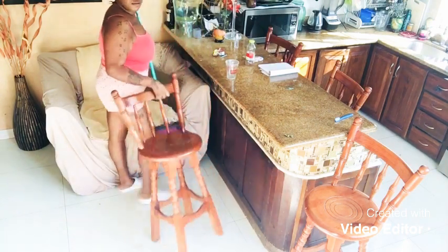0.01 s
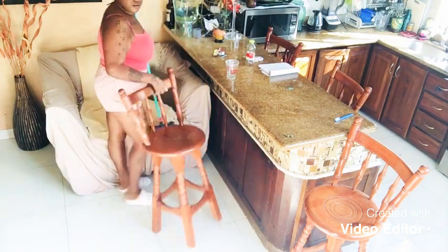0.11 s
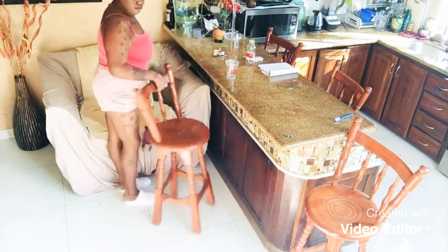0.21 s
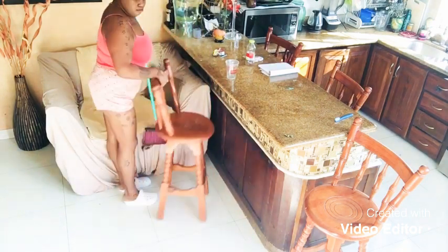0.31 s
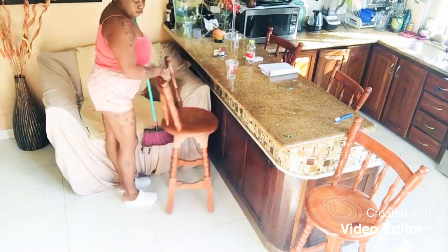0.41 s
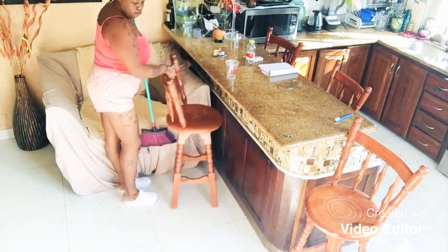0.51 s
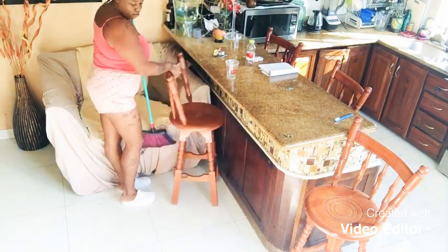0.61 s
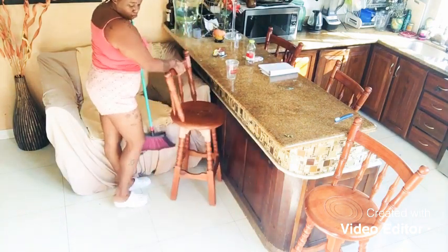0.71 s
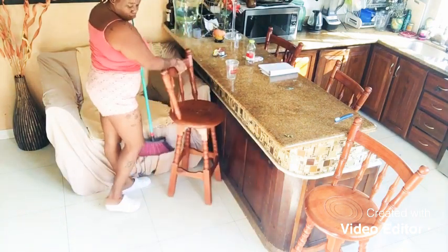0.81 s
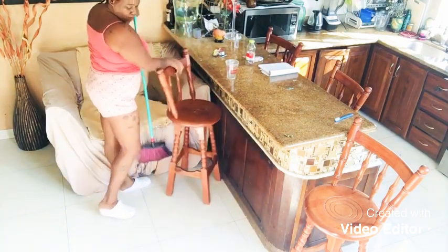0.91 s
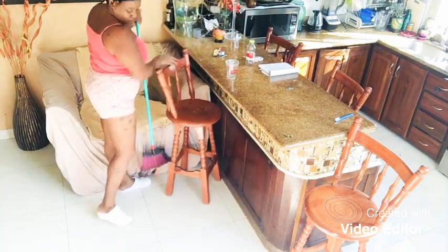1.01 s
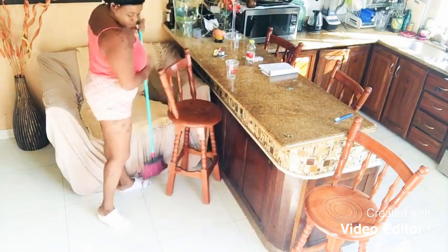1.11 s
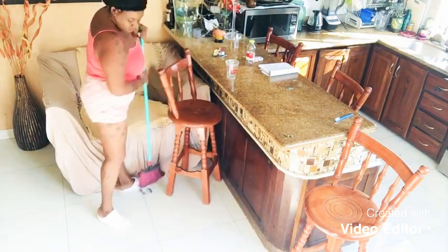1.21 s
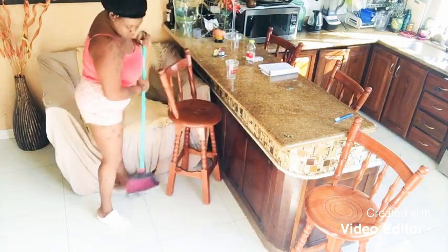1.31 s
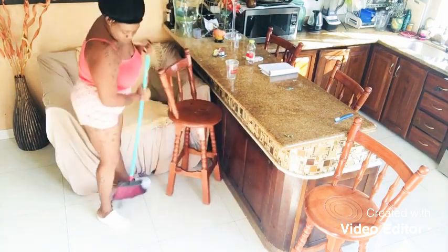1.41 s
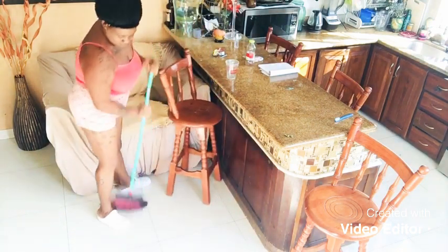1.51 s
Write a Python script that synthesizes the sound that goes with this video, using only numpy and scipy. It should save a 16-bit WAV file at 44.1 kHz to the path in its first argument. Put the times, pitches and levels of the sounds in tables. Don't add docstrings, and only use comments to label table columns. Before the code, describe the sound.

Wooden stool dragged on kitchen tiles, close up in a bright, hard room. Faint broom hiss until 0.2 s, then a loud double wooden knock at 0.22 s and rough, stuttering scraping with hollow clacks and low groans until 0.7 s. A weaker shove comes at 0.81-0.93 s, a low scuff with broom swish and ticks around 1.05-1.2 s, then near quiet with a faint brush at 1.5 s.

```python
import sys
import numpy as np
from scipy import signal
from scipy.fft import rfft, irfft, next_fast_len
from scipy.io import wavfile
from scipy.ndimage import map_coordinates

SR = 44100
rng = np.random.default_rng(int(sys.argv[2]) if len(sys.argv) > 2 else 0)


def volts(x):
    e = np.asarray(x, float) / 20
    return 10 ** e


def materialize(psi):
    bounded = np.clip(np.atleast_2d(psi).T, -1, 1)
    quanta = np.round(bounded * 32767).astype(np.int16)
    wavfile.write(sys.argv[1], SR, quanta)


N = 70560

# start_s, peak_db, ring_pitch_hz, chatter_s, brightness_db_per_octave
KNOCKS = [
    (0.2186, -6, 1560, 0.0076, 0.5),
    (.227, -3.5, 1390, 0.0075, 0.5),
    (0.241, -14.5, 1200, 0.0155, 2),
    (0.8104, -20.5, 1900, 0.013, -1.5),
    (1.056, -29.5, 595, 0.012, -2.5),
]


def unit(x):
    return x / np.sqrt(np.mean(x ** 2) + 1e-20)


def along(points, hz):
    f, v = np.transpose(points)
    return np.interp(np.log(hz + 1), np.log(f + 1), v)


def curves(rows):
    s, *cols = np.transpose(rows)
    return [np.interp(np.arange(N) / SR, s, c) for c in cols]


def wobble(rate_hz):
    return map_coordinates(rng.standard_normal(400), [np.arange(N) * rate_hz / SR])


def filtered(x, response):
    m = next_fast_len(len(x) + 8192)
    return irfft(rfft(x, m) * response(np.fft.rfftfreq(m, 1 / SR)), m)[:len(x)]


def causal(gain):
    c = irfft(np.log(gain + 1e-6))
    c[1:len(c) // 2] *= 2
    c[len(c) // 2 + 1:] = 0
    return np.exp(rfft(c))


def modes(table, f):
    total = 0
    for k, (centre, width, db) in enumerate(table):
        damping = 1j * f * width
        total = total + (-1) ** k * volts(db) * damping / (centre * centre - f * f + damping)
    return total


def wood(f):
    # pitch_hz, level_db
    broad = [(120, -7.5), (300, -5), (900, -2.5), (2300, -2.5), (3900, -15), (4900, -23.5), (7000, -24.5),
             (15500, -43)]
    # pitch_hz, width_hz, level_db
    legs = [(663, 49, 4), (867, 32, 1), (948, 86, 5), (1127, 52, 11.5), (1302, 40, 0), (1488, 34, 2),
            (1650, 48, 2.5), (1706, 32, 2.5), (2027, 73, 3), (2153, 24, 2.5), (2950, 240, -0.5),
            (3584, 180, 11), (4334, 160, 9)]
    return volts(along(broad, f)) * (1 + volts(-6) * np.abs(modes(legs, f)))


def slips(per_s, scatter_db):
    happens, draw, side = rng.random((3, N))
    size = volts(-scatter_db * np.log(draw + 0.039)) * np.sign(side - .5)
    return unit((happens < per_s / SR) * size + 0.17 * rng.standard_normal(N))


def contact(peak_s, hz, length_s, tilt_db, ring_db):
    t = np.arange(8192) / SR
    rise_s, grit_s, grit_db = .0008, .0015, 2
    swell = (1 - np.exp(-t / rise_s)) * np.exp(-((t - peak_s) / length_s) ** 2)
    grit = np.interp(t / grit_s, np.arange(200), rng.standard_normal(200))
    chatter = np.pad(rng.standard_normal(len(t)) * swell * volts(grit_db * grit), (0, 8192))
    f = np.fft.rfftfreq(len(chatter), 1 / SR)
    tilt = volts(tilt_db * np.log2(np.clip(f, 200, 6000) / 1500))
    ring = 1 + volts(ring_db) * np.abs(modes([(hz, .45 * hz, 0)], f))
    blow = irfft(rfft(chatter) * causal(wood(f) * tilt * ring))[:len(t)]
    return volts(-6) * blow / np.sqrt(np.sum(blow ** 2) / (length_s * SR))


def knocks():
    out = np.zeros(N + 8192)
    for s, db, hz, length_s, tilt_db in KNOCKS:
        out[round(s * SR):][:8192] += volts(db) * contact(0, hz, length_s, tilt_db, ring_db=9)
    return out[:N]


def skids():
    # peak_s, level_db, ring_pitch_hz, half_length_s, brightness_db_per_octave
    crossings = [(0.093, -35, 1040, 0.0067, -10), (0.119, -40.5, 590, 0.015, 11),
                 (0.282, -16.5, 1400, 0.007, -4), (0.323, -17.5, 2200, 0.0075, -0.5),
                 (0.372, -16.5, 1290, 0.0078, 2.5), (0.401, -7.5, 2360, .006, 1.1),
                 (0.41, -11.5, 1220, 0.0055, -1), (0.431, -13.5, 696, 0.0057, -1.5),
                 (0.488, -16, 2083, 0.009, 0), (0.537, -15.5, 1070, .01, -0.5),
                 (0.564, -10, 1850, 0.0053, 0.5), (0.582, -10, 1970, 0.0084, 2.5),
                 (0.616, -15.5, 2160, 0.0053, 1), (0.644, -11, 2270, .014, 3.5),
                 (0.829, -15, 850, 0.0067, -3.5), (.843, -21.5, 1130, 0.0066, -1),
                 (0.874, -25, 1110, 0.0058, -3), (0.919, -28, 880, .006, -2.5),
                 (0.857, -24.5, 1154, 0.013, 1.5), (0.886, -27.5, 1420, 0.014, 1.5),
                 (1.081, -24, 1140, .007, -0.5), (1.106, -23, 808, 0.0062, -1.5),
                 (1.114, -22.5, 2120, 0.0042, 3), (1.121, -17.5, 1870, .006, -0.5),
                 (1.135, -28.5, 1480, 0.0074, -0.5), (0.508, -19, 1110, .008, -0.5),
                 (0.669, -21.5, 1110, .01, 1.5)]
    out = np.zeros(N + 8192)
    for s, db, hz, half_s, tilt_db in crossings:
        lead_s = 2 * half_s
        out[round((s - lead_s) * SR):][:8192] += volts(db) * contact(lead_s, hz, half_s, tilt_db, ring_db=7)
    return out[:N]


def seat():
    # pitch_hz, level_db, t60_s
    seat_modes = [(489.4, -8.5, 0.079), (666, -16.5, 0.11), (817, -7.5, 0.059), (1111, -7, .12),
                  (1315, -8, 0.063), (1462, -1, 0.089), (1609, 3.5, 0.087), (1748, -4, 0.14),
                  (1940, -5, 0.12), (2115, -7, 0.079)]
    crack_hz, crack_db, crack_t60_s = 4840, -30, 0.067
    out, t = np.zeros(N + 8192), np.arange(8192) / SR
    for s, db, *_ in KNOCKS:
        ring = 0
        for hz, level_db, t60_s in seat_modes:
            spread_db = 2 * rng.standard_normal()
            ring = ring + volts(level_db + spread_db - 60 * t / t60_s) * np.sin(2 * np.pi * hz * t)
        crack = unit(filtered(rng.standard_normal(len(t)),
                              lambda f: f ** 2 / (f ** 2 + crack_hz ** 2) / (1 + (f / crack_hz) ** 2)))
        crack = volts(crack_db - 60 * t / crack_t60_s) * crack
        out[round(s * SR):][:len(t)] += volts(db) * (volts(-14.5) * ring + crack)
    return out[:N]


def scrape():
    # time_s, level_db
    drag = [(0, -51.5), (.1, -50), (.2, -54), (.222, -34.5), (.245, -20), (.285, -20.5), (.3, -30.5),
            (.35, -30.5), (.42, -23.5), (.47, -30), (.6, -23), (.68, -29), (.76, -39.5), (.85, -43),
            (.92, -43), (1.03, -51.5), (1.1, -41), (1.2, -40), (1.35, -70), (1.6, -68)]
    pressure_db, = curves(drag)
    grains = unit(filtered(slips(per_s=2200, scatter_db=2.5), wood))
    return volts(pressure_db - 2 + 1.5 * wobble(45)) * grains


def judder():
    # time_s, rate_hz, level_db
    rocking = [(0, 75.7, -51.5), (.092, 72.4, -48.5), (.2, 72.9, -56), (.232, 69.5, -40.5), (.3, 71, -49),
               (.392, 75, -44), (.444, 75.6, -52.5), (.482, 74.2, -46), (.584, 74.4, -45.5),
               (.63, 73.5, -38), (.782, 72.9, -48.5), (.834, 73.9, -43), (.905, 86.6, -37.5),
               (.94, 80, -62.5), (1.01, 74, -49), (1.088, 91, -51), (1.154, 96.4, -43.5),
               (1.21, 88.8, -61.5), (1.6, 76, -72.5)]
    rate_hz, level_db = curves(rocking)
    turn = 2 * np.pi * np.cumsum(rate_hz * (1 + .07 * wobble(40))) / SR
    level = np.sqrt(2) * volts(level_db + 4.0 + 1.7 * wobble(60))
    return level * (np.sin(turn) + 0.043 * np.sin(2 * turn))


def moans():
    # middle_s, half_length_s, first_pitch_hz, last_pitch_hz, level_db
    sung = [(0.134, 0.033, 602, 588, -53), (0.24, 0.022, 490, 482, -33), (0.285, 0.014, 183, 179, -32),
            (0.51, 0.033, 351, 358, -31), (0.58, .045, 175, 172, -32), (0.685, 0.038, 352, 357, -34),
            (.826, .014, 166, 164, -37), (.89, .028, 174, 183, -39), (.875, .018, 238, 244, -41),
            (0.92, 0.03, 252, 259, -42), (.99, 0.065, 263, 250, -47), (1.105, 0.027, 170, 174, -32),
            (1.185, 0.035, 178, 205, -41), (1.26, .03, 170, 160, -51), (1.03, .03, 166, 172, -48),
            (0.355, 0.03, 180, 186, -35), (.41, .025, 180, 186, -35), (.5, .02, 172, 174, -36),
            (.655, .015, 176, 174, -37), (.42, .015, 350, 360, -37), (.83, .018, 240, 236, -42),
            (1.504, 0.0577, 212, 216, -63), (0.042, 0.15, 290, 299, -60), (1.12, .05, 362, 358, -41),
            (1.23, .025, 352, 348, -48), (.826, .014, 485, 480, -39), (.826, .014, 560, 560, -40),
            (1.11, .02, 490, 485, -42), (.43, .03, 680, 660, -35)]
    out, t = np.zeros(N), np.arange(N) / SR
    for s, half_s, first_hz, last_hz, db in sung:
        pitch_hz = np.interp(t, [s - half_s, s + half_s], [first_hz, last_hz])
        turn = 2 * np.pi * np.cumsum(pitch_hz * (1 + .005 * wobble(40))) / SR
        swell = np.exp(-((t - s) / half_s) ** 2)
        out += np.sqrt(2) * volts(db + 1.5 * wobble(50)) * swell * np.sin(turn)
    return out


def hum():
    # time_s, level_db
    load = [(0.0, -44.5), (0.186, -83), (0.23, -33), (.45, -28.5), (.72, -32), (.79, -54), (.83, -34),
            (.92, -41), (.95, -52), (1.04, -44.5), (1.108, -26), (1.2, -40.5), (1.376, -67.5), (1.6, -64.5)]
    # pitch_hz, width_hz, level_db
    frame_modes = [(168.8, 33, 0.5), (197, 35.4, 0.5), (243.2, 11, -2.5), (364.5, 65, -5), (483, 23, -6.5),
                   (573, 48, -8.5)]
    load_db, = curves(load)

    def body(f):
        boom = f ** 3 * 120 / (90 ** 2 + f * f) ** 2 / (1 + (f / 500) ** 2)
        return modes(frame_modes, f) + 0.26 * boom

    return volts(load_db - 4.0) * unit(filtered(slips(per_s=600, scatter_db=2.3), body))


def bristles():
    # start_s, swell_s, fade_s, level_db
    strokes = [
        (-.05, 0.056, 0.3, -60.5),
        (.045, 0.042, 0.27, -60.5),
        (.988, 0.0073, 0.029, -51.5),
        (1.052, 0.01, 0.15, -49.5),
        (1.461, 0.015, 0.069, -59),
        (1.5, 0.06, .08, -56.5),
    ]
    # pitch_hz, level_db_per_hz
    colour = [(240, -65), (400, -16), (1120, -3.5), (1240, -2.5), (1510, -5), (1690, -4.5), (3570, -1.5),
              (11200, -13), (15500, -17)]
    t, shape = np.arange(N) / SR, np.zeros(N)
    for s, swell_s, fade_s, db in strokes:
        swell = np.clip((t - s) / swell_s, 0, 1) ** 0.58
        shape += volts(db) * swell * np.exp(-np.clip((t - s - swell_s) / fade_s, 0, 9))
    hiss = unit(filtered(slips(per_s=5000, scatter_db=0.81), lambda f: volts(along(colour, f))))
    return shape * volts(wobble(60)) * hiss


def ticks():
    # start_s, level_db, ring_pitch_hz, ring_over_rattle_db
    taps = [
        (0.855, -53, 6350, 3),
        (.99, -65, 4600, 11),
        (0.999, -59, 6600, -1),
        (1.004, -74, 5390, 19),
        (1.025, -64, 5430, 3),
        (1.08, -52.5, 5600, -8.5),
        (1.467, -58, 2950, 2.5),
    ]
    ring_t60_s, rattle_t60_s = 0.076, 0.057
    out, t = np.zeros(N + 4096), np.arange(4096) / SR
    for s, db, hz, ring_db in taps:
        drift, noise = rng.standard_normal((2, 4097))
        ring = np.sin(2 * np.pi * hz * t + 0.061 * np.cumsum(drift[1:]))
        ring = volts(ring_db - 60 * t / ring_t60_s) * ring
        rattle = volts(-60 * t / rattle_t60_s) * np.diff(noise)
        out[round(s * SR):][:4096] += volts(db) * (ring + rattle)
    return out[:N]


def whistles():
    # start_s, end_s, pitch_hz, width_hz, level_db
    bands = [
        (.045, .23, 9800, 894, -70),
        (0.043, 0.225, 11500, 1000, -69),
        (1.081, 1.095, 5400, 900, -49),
        (1.081, 1.095, 4100, 500, -48),
    ]
    out, t = np.zeros(N), np.arange(N) / SR
    for s, end, hz, width, db in bands:
        gate = np.clip(np.minimum(t - s, end - t) / .006, 0, 1)
        hiss = unit(filtered(rng.standard_normal(N), lambda f: modes([(hz, width, 0)], f) ** 2))
        out += volts(db + 3.04 * wobble(67)) * gate * hiss
    return out


def room(x):
    # pitch_hz, t60_s
    decay = [(100, 1), (400, 0.59), (1500, 0.45), (4000, 0.47), (8000, 0.37), (14000, 0.48)]
    step, wall = round(.1 * SR), round(.004 * SR)
    out = np.zeros(N + 2 * SR)
    for at in range(0, N, step):
        hz, t, z = signal.stft(rng.standard_normal(SR // 2 + 4096), SR, nperseg=256)
        fading = z / (np.abs(z) + 1e-9) * volts(-60 * t / along(decay, hz)[:, None])
        tail = signal.istft(fading, SR, nperseg=256)[1]
        piece = signal.fftconvolve(x[at:at + step], tail / np.linalg.norm(tail))
        out[at + wall:][:len(piece)] += piece
    return out[:N]


def still_air():
    # pitch_hz, level_db_per_hz
    colour = [(25, -36.5), (60, 6.5), (200, -9), (430, -24.5), (1200, -24), (2300, -36), (6000, -42),
              (15500, -36.5)]
    return volts(-58) * unit(filtered(rng.standard_normal(N), lambda f: volts(along(colour, f))))


def scene():
    hits = knocks() + skids() + seat()
    rub = scrape() + hum() + bristles() + ticks() + whistles()
    answer = volts(-4.5) * room(hits + volts(-8.5) * rub)
    return (hits + rub + judder() + moans() + answer + still_air())[None]


def low_pass(x):
    return signal.sosfilt(signal.butter(12, 15710, fs=SR, output="sos"), x)


def record(dry):
    # pitch_hz, level_db
    mic = [(22, -29.5), (55, 0), (7100, 0), (8000, -4), (9500, -0.5), (11800, -4), (12800, -4.5),
           (15600, -11)]
    ceiling, knee, top_hz = .9, 4, 15720
    held = dry[0] / (1 + np.abs(dry[0] / ceiling) ** knee) ** (1 / knee)
    heard = filtered(held, lambda f: (f < top_hz) * volts(along(mic, f)))
    return low_pass(heard[None])


dry = scene()
out = record(dry)
materialize(out)
```